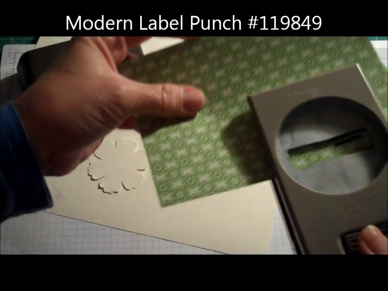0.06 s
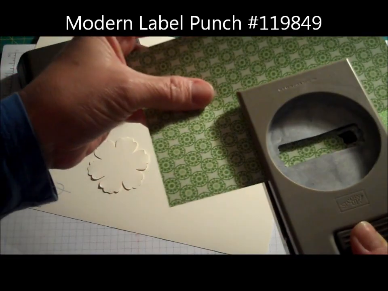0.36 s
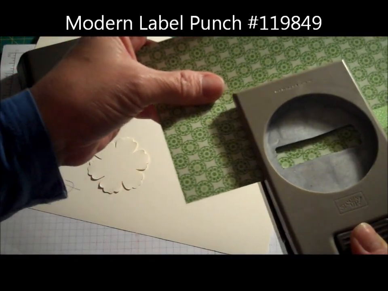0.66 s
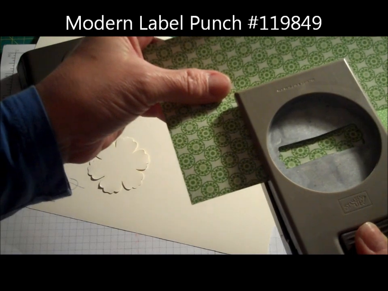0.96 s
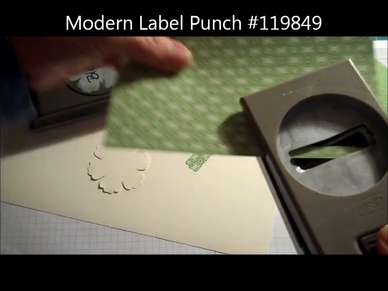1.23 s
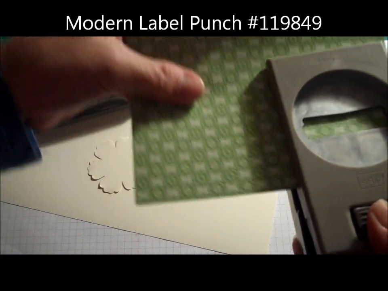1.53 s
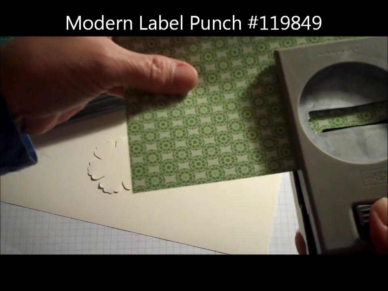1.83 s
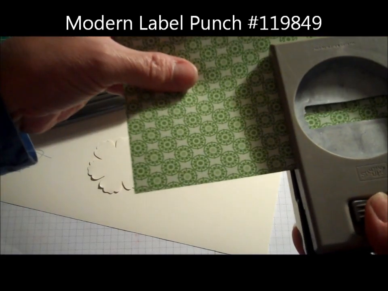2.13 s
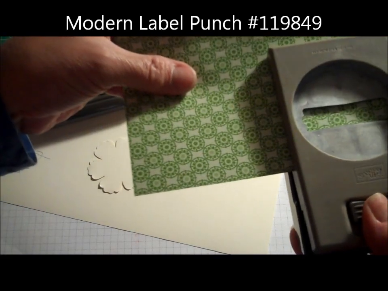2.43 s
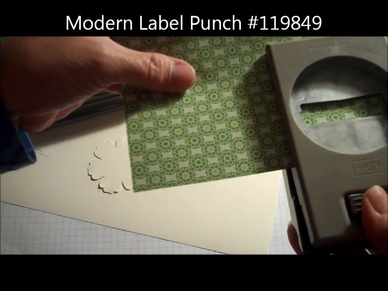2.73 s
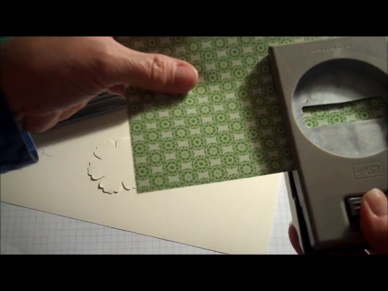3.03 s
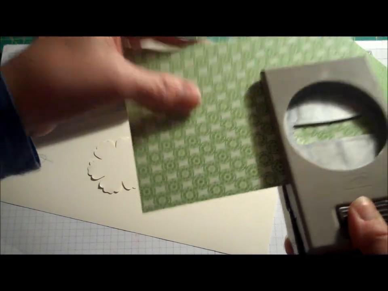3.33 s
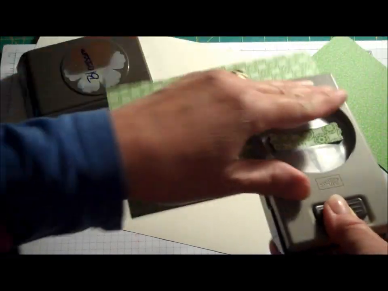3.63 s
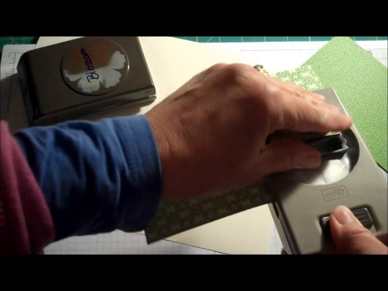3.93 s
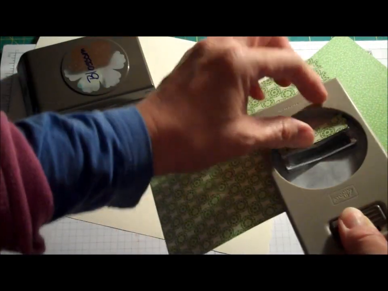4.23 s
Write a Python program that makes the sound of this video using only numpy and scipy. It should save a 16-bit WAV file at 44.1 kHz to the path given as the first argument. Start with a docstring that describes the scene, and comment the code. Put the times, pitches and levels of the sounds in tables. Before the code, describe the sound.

Close up in a small room, stiff paper scrapes and rustles in short pushes as it is fed into a handheld punch. The handling almost stops, then come two sharp knocks and some loose rattling. The punch goes through with a loud, crunching clack that overloads the microphone, and snaps back with a slight metallic ring. A few soft paper ticks finish, over faint hiss and a thin high whine.

```python
"""A sheet of patterned card rustles and ticks as friction drives it along the slot of a hand craft punch.
The punch knocks down twice, is pressed through the card with a loud crunching clack, springs back and snaps.
Each blow excites the modes of its plastic shell and its steel; the loose die rattles.
The loudest clacks carry a brief low thump and overload the microphone.
A small room, faint hiss and a thin camera whine lie behind."""
import sys
import numpy as np
from scipy import signal
from scipy.fft import rfft, irfft, next_fast_len
from scipy.io import wavfile
from scipy.ndimage import uniform_filter1d, map_coordinates

SR = 44100
rng = np.random.default_rng(int(sys.argv[2]) if len(sys.argv) > 2 else 0)


def to_wav(sig):
    """Store sig (one row per channel, or 1-D mono) as 16-bit WAV at the path in sys.argv[1].

    Samples outside -1..1 are clipped; the rate is SR.
    """
    pcm = np.clip(np.atleast_2d(sig), -1, 1) * 32767
    pcm = np.round(pcm).astype(np.int16)
    wavfile.write(sys.argv[1], SR, pcm.T)  # frames by channels


N = 192805

# blows of the punch: t/s, level/dB, rise/s, hold/s, knock/dB, treble/dB,
# main contact resonance f/Hz, its gain/dB, second resonance f/Hz, grip of the hand (0-1)
BLOWS = [ (3.0345, 15.2, 0.004, 0.0023, 0, -1.5, 1730, 10, 394, 0),
         (3.1661, 17, 0.00061, 0.0057, 1, 2, 1106, 6.5, 458, 0),
         (3.5425, 25.5, 0.00284, 0.00502, -7.5, -0.5, 1295, 8.5, 2450, .5),
         (3.7068, 20, .00079, .0027, -12.5, 1.5, 2295, 11, 3860, 0.9),
         (3.7548, 7, 0.0002, 0.001, -3, 1.5, 920, 18.5, 1640, 1)]
def clacks(t60=0.014, second_db=6):
    """Impact excitation: each blow sounds the hollow shell and two resonances of the struck spot."""
    track = np.zeros((2, N))
    for start, db, rise, hold, knock_db, treble_db, main_hz, main_db, second_hz, _ in BLOWS:
        spots = [(main_hz, main_db), (second_hz, second_db)]
        add(track, start, amp(db) * contact(rise, hold, t60, knock_db, treble_db, spots, hollow=0.75))
    return spread(track)


# spectral envelope of the plastic shell: f/Hz, level/dB
SHELL_SPECTRUM = [(60, -31), (170, -13), (300, -13.5), (400, -8), (680, -11), (1000, -3), (2500, -3.5),
                  (3600, 0), (6000, 1.5), (8000, 3), (10500, -11.5), (14000, -17.5)]
# its resonances: f/Hz, half-width/Hz, gain/dB at hollow = 1
SHELL_MODES = [(492, 27, 9), (1158, 61, 15), (1269, 23, 9.5), (1438, 26, 6.5), (1770, 76, 10),
               (2116, 17, 9.5), (2550, 114, 9.5), (2907, 41, 13.5), (3150, 75, 7), (3930, 110, -3),
               (4010, 18, 7.5), (4430, 30, 7), (5383, 47, 8.5), (5900, 180, 7), (6670, 75, 4.5)]
def contact(rise, hold, t60, knock_db, treble_db, spots, hollow, size=8192):
    """Source and filter: surface chatter drives the shell and the struck spot's (f/Hz, gain/dB) peaks."""
    t, hz = np.arange(size) / SR, np.fft.rfftfreq(size, 1 / SR)
    force = np.minimum(t / rise, 1) * amp(-60 * np.maximum(t - rise - hold, 0) / t60)
    chatter = rng.standard_normal((2, size))
    for _ in range(2):  # hard contact excites all frequencies evenly
        phase = np.angle(rfft(chatter * np.sqrt(force)))
        chatter = irfft(np.exp(1j * phase))
    chatter *= np.sqrt(force)
    chatter /= np.linalg.norm(chatter, axis=1, keepdims=True)
    peak = lambda centre, width: 1 / (1 + ((hz - centre) / width) ** 2)
    db = along(SHELL_SPECTRUM, hz)
    db += hollow * sum(gain * peak(f, width) for f, width, gain in SHELL_MODES)
    db += sum(gain * peak(f, 0.13 * f) for f, gain in spots)
    db += along([(550, knock_db), (1050, 0), (2600, 0.0038), (5500, treble_db)], hz)
    # each point of contact favours some of the shell's many upper modes and misses others
    db += 2.5 * ripple(hz.shape, size=(20,)) * along([(1000, .4), (2500, 1)], hz)
    return irfft(rfft(chatter) * minimum_phase(db))


# modes of the die and spring: f/Hz, relative level/dB, undamped by the hand t60/s
STEEL_MODES = [(1096, -5.5, 0.82), (1143, -2.5, 0.9), (1240, -13, .5), (2046, -6, 0.26), (2995, -4, 0.25),
               (3660, -6, 0.44), (4430, -16, .2), (6000, -22.5, .18)]
def steel_ring(ring_db=-50, grip_db=-27, grip_damping=0.63, buzz=0.36):
    """Damped free vibration: the steel rings after each blow, softer and shorter under a firm grip."""
    track, t = np.zeros(N), np.arange(SR) / SR
    for start, db, rise, *_, grip in BLOWS:
        life = 1 - grip_damping * grip
        ring = np.zeros(SR)
        for hz, level, t60 in STEEL_MODES:
            decay = amp(level + rng.normal(0, 1.2) - 60 * t / (t60 * life))
            ring += decay * np.sin(2 * np.pi * hz * t)
        add(track, start + rise, amp(db + ring_db + grip_db * grip) * ring)
    return track * (1 + buzz * wobble(150))  # the spring rattles in its seat


# knocks of the loose die: t/s, level/dB, hold/s, t60/s, treble/dB, contact resonance f/Hz
DIE_KNOCKS = [ (2.203, -25, .0003, .035, -8, 1600), (2.36, -22.5, .0003, .012, -2, 1900),
              (2.775, -18, .0003, .03, -16, 1400), (3.1473, 1, .013, .022, -6, 5800),
              (3.328, 0.5, .005, 0.042, -5, 1800), (3.366, -5.5, .001, .035, -1, 1260),
              (3.401, -5.5, .001, 0.066, -1, 1251), (3.587, 2, 0.0037, 0.015, 1, 2300),
              (3.6045, 2, 0.0046, .018, -1, 1140), (3.68, -10.5, .0005, 0.07, -3.5, 7450),
              (3.7, -6.5, 0.0049, 0.011, 1, 7540), (3.714, 7, .003, .14, -6, 2130)]
def die_rattle(rise=0.0013, knock_db=-5.5, spot_db=9):
    """Impacts across a clearance: the loose die strikes the shell before and between the blows."""
    track = np.zeros((2, N))
    for start, db, hold, t60, treble_db, hz in DIE_KNOCKS:
        knock = contact(rise, hold, t60, knock_db, treble_db, [(hz, spot_db)], hollow=0.75)
        add(track, start, amp(db) * knock)
    return spread(track)


# low thumps under the loudest clacks: t/s, level/dB
LOW_THUMPS = [(3.1655, -55), (3.5458, -14), (3.706, -50)]
def low_thump(pulse_s=0.0011, tail_s=0.049):
    """A pulse of zero net area: a brief low thump, then a slow, faint sub-bass tail of opposite sign."""
    track, t = np.zeros(N), np.arange(SR // 2) / SR
    pulse = t / pulse_s * np.exp(1 - t / pulse_s)
    tail = np.e * pulse_s * t / tail_s ** 2 * np.exp(-t / tail_s)
    for start, db in LOW_THUMPS:
        add(track, start, amp(db) * (pulse - tail))
    return track


# spectral densities of the rubbed sheet and of its edge: f/Hz, relative level/dB
SHEET_SPECTRUM = [(150, -54), (260, -18.5), (400, -16), (610, -20.5), (800, -9.5), (930, -5), (1030, -10.5),
                  (1350, -4), (1670, 0.5), (1880, -1.2), (2020, -7), (2900, -6), (4000, -7.5), (5500, -26)]
EDGE_SPECTRUM = [(2000, -33), (3200, -10), (4500, -5.5), (5500, -3), (5850, 0.5), (6600, -2), (7500, 2.5),
                 (8300, -8), (9200, -12.5), (10200, -22), (14000, -29.5)]
# pushes of the card: t/s, rise/s, slide/s, fall by 20 dB/s, sheet level/dB, edge over sheet/dB
PUSHES = [ (-0.02, .02, 0.062, 0.14, -37, 8), (0.11, 0.051, .135, 0.12, -46.5, 3.5),
          (0.34, .06, 0.048, 0.05, -47, 2.5), (0.43, 0.058, .005, 0.34, -42, 4),
          (0.982, .05, .015, 0.2, -40, 6), (1.03, 0.052, 0.17, 0.05, -37.5, 6.5),
          (1.286, 0.026, 0.089, 0.09, -39.5, 8), (1.37, 0.049, .05, 0.0642, -33.5, 3.5),
          (1.455, 0.041, .002, 0.09, -28.5, 3.2), (1.615, 0.038, .025, .14, -37.5, 4),
          (1.83, 0.043, .02, 0.1051, -52.5, 3), (1.93, 0.078, .003, .04, -53.5, 4.5),
          (2.44, 0.039, 0.0046, 0.06, -54, 0.5), (2.57, .04, 0.0073, .06, -50.5, 1.5),
          (3.225, 0.03, 0.15, 0.16, -42, 6), (3.77, 0.034, 0.056, 0.33, -50.5, 6),
          (3.94, 0.022, 0.15, 1, -59, 10), (4.12, 0.042, .003, 0.02, -42, 3.5),
          (4.24, .07, .07, .1, -58.5, 15)]
def card_slide(slowing_db_per_s=9):
    """Sliding friction: with each slowing push the sheet radiates a hollow rush and its edge hisses."""
    sheet_power, edge_power = np.zeros((2, N))
    for start, rise, slide, fall, db, edge_db in PUSHES:
        push = amp(db) * swell(start, rise, slide, fall, slowing_db_per_s)
        sheet_power += push ** 2
        edge_power += (amp(edge_db) * push) ** 2
    sheet = friction(SHEET_SPECTRUM, catches_per_s=600, catch_db=-11.5, flutter_db=0.27, flex_db=2.5)
    edge = friction(EDGE_SPECTRUM, catches_per_s=300, catch_db=-7, flutter_db=0.96, flex_db=2.0)
    pressure = amp(.7 * wobble(35))
    return (np.sqrt(sheet_power) * sheet + np.sqrt(edge_power) * edge) * pressure


def friction(spectrum, catches_per_s, catch_db, flutter_db, flex_db):
    """Roughness noise: rubbing fibres give a fine rush with sparse catches, under uneven pressure."""
    catches = (rng.random(N) < catches_per_s / SR) * rng.standard_normal((2, N))
    rub = rng.standard_normal((2, N)) + amp(catch_db) * unit(catches)
    rub *= amp(flutter_db * wobble(70))
    return spread(coloured(flexed(rub, flex_db), spectrum))


def flexed(x, depth_db):
    """Time-varying filtering: the sheet's narrow resonances come and go as it bends."""
    frames = signal.stft(x, nperseg=1024)[2]
    frames *= amp(depth_db * ripple(frames.shape[1:], size=(3, 10)))
    return signal.istft(frames, nperseg=1024)[1][:, :N]


# the card's edge catching in the slot: t/s, level/dB, t60/s, treble/dB, resonance f/Hz
EDGE_TICKS = [ (1.011, -9.5, 0.11, 2.5, 1710), (1.093, -11, .01, 1, 7000), (1.13, -5.5, .04, -2, 6000),
              (1.162, -5.5, .008, -2.5, 6960), (1.206, -11.5, 0.018, 0, 6250),
              (1.308, -7.5, 0.043, -1, 6450), (1.494, 2.5, 0.045, -9.5, 1730),
              (1.641, -13.5, .08, -1, 1700), (2.008, -21, .03, 2.5, 1500), (3.3408, -2.5, .018, 1, 6500),
              (3.4141, -7.5, 0.01, 0.5, 6700), (3.443, -14, 0.019, -4, 7350),
              (3.8148, -8, 0.065, 6.5, 5300), (3.8578, -12, .01, 1.5, 6900), (3.871, -11, 0.01, 0.5, 7460),
              (4.009, -26.5, 0.0038, 16.5, 11400), (4.03, -3, 0.031, 1.5, 5240), (4.09, -26, .014, 9, 7850),
              (4.232, -13, 0.11, 5, 4600), (4.239, -3.5, 0.011, 6.5, 5650)]
# the sheet bumping on the desk: t/s, level/dB, resonance f/Hz
SHEET_BUMPS = [(0.753, -18, 420), (1.272, -10.5, 402), (1.309, -9.5, 723)]
def card_taps(rise=0.00058, hold=0.00013, hollow=0.43):
    """Light impacts: the card's crisp ticks and soft bumps are too weak to ring the steel."""
    track = np.zeros((2, N))
    for start, db, t60, treble_db, hz in EDGE_TICKS:
        tick = contact(rise, hold, t60, knock_db=-6, treble_db=treble_db, spots=[(hz, 12)], hollow=hollow)
        add(track, start, amp(db) * tick)
    for start, db, hz in SHEET_BUMPS:
        bump = contact(rise, hold, t60=0.056, knock_db=10, treble_db=-10, spots=[(hz, 14.5)], hollow=hollow)
        add(track, start, amp(db) * bump)
    return spread(track)


# reverberation time of the room: f/Hz, t60/s
ROOM_DECAY = [(200, 0.18), (1200, .2), (5000, 0.17), (12000, 0.13)]
def reverberation(x, delay_s=.004):
    """Diffuse reflection: the desk and near walls answer with a short, exponentially decaying tail."""
    hz, t, frames = signal.stft(rng.standard_normal((2, SR // 3)), SR, nperseg=256)
    decay = amp(-60 * t / along(ROOM_DECAY, hz)[:, None])
    tail = signal.istft(frames * decay, SR, nperseg=256)[1]
    tail /= np.linalg.norm(tail[0])
    tail = np.pad(tail, ((0, 0), (round(delay_s * SR), 0)))
    return spread(signal.fftconvolve(x[:1], tail, axes=1)[:, :N])


# spectral density of the background noise: f/Hz, relative level/dB
HISS_SPECTRUM = [(15, -22), (25, -13.5), (70, -11.5), (197, -6), (301, -6.5), (598, -10), (1250, -12.5),
                 (2770, -16), (3000, -15), (3340, -14.5), (4470, -11.5), (4830, -14.5), (6130, -9),
                 (13900, -24)]
def room_hiss(level_db=-53):
    """Stationary noise: room rumble and a hiss with a faintly ribbed spectrum."""
    ribs = lambda hz: amp(ripple(hz.shape, size=(200,)) * along([(500, .5), (2500, 1.9)], hz))
    noise = filtered(rng.standard_normal((2, N)), ribs)
    return amp(level_db) * spread(coloured(noise, HISS_SPECTRUM))


# faint camera tones: f/Hz, level/dB
CAMERA_TONES = [(195, -69), (249, -73), (3009, -70), (3628, -75), (4344, -76), (4592, -70), (5050, -77),
                (6638, -77)]
# spells of the whine: t/s, duration/s, level/dB
WHINE_SPELLS = [(0, 1.9, -58), (2.087, 0.2, -63), (2.457, 0.59, -58), (2.8, .22, -58)]
def camera_whine(whine_hz=6126, idle_db=-69, fade_s=.025):
    """A line spectrum: faint lasting tones and one thin whine that swells and recedes."""
    hum = sum(amp(db) * tone(hz) for hz, db in CAMERA_TONES)
    spells = [amp(db) * swell(start, fade_s, length, fade_s) for start, length, db in WHINE_SPELLS]
    whine_gain = np.hypot(np.linalg.norm(spells, axis=0), amp(idle_db))
    return hum + whine_gain * tone(whine_hz)


def tone(hz, drift_hz=3):
    """Slight random modulation of frequency and amplitude: a nearly steady line of rms about 1."""
    phase = 2 * np.pi * np.cumsum(hz + drift_hz * wobble(40)) / SR
    return np.sqrt(2) * amp(wobble(34)) * np.sin(phase)


# likeness of left and right: f/Hz, coherence (0-1)
COHERENCE = [(100, 0.74), (1200, 0.9), (2200, 0.8), (4000, 0.57), (6000, 1), (8000, 0.22), (11000, 0.19)]
def spread(pair):
    """Partial coherence: two unrelated signals mix as mid and side, least alike in the high treble."""
    angle = lambda hz: np.arccos(np.clip(along(COHERENCE, hz), 0, 1)) / 2
    mid, side = filtered(pair, lambda hz: np.array([np.cos(angle(hz)), np.sin(angle(hz))]))
    return np.array([mid + side, mid - side])


def swell(start, rise, hold, fall, sag_db_per_s=0, steepening=1.35):
    """An envelope that rises, sags while held, then dies ever faster, by 20 dB after fall seconds."""
    t = np.arange(N) / SR - start
    attack = np.sin(np.pi / 2 * np.clip(t / rise, 0, 1)) ** 2
    sag_db = sag_db_per_s * np.clip(t - rise, 0, hold)
    release_db = 20 * (np.maximum(t - rise - hold, 0) / fall) ** steepening
    return attack * amp(-sag_db - release_db)


def wobble(rate):
    """Spline interpolation: a smooth random curve, rate knots a second."""
    knots = rng.standard_normal(int(N * rate / SR) + 4)
    return map_coordinates(knots, [np.arange(N) * rate / SR])


def ripple(shape, size):
    """Moving averages: a random field of rms 1, smooth over size cells along each axis."""
    field = rng.standard_normal(shape)
    for axis, cells in enumerate(size):
        field = uniform_filter1d(uniform_filter1d(field, cells, axis), cells, axis)
    return unit(field)


def minimum_phase(db):
    """Causality: the response with these dB that rings only after the blow."""
    cepstrum = irfft(np.log(amp(db)))
    half = len(cepstrum) // 2
    return np.exp(rfft(np.r_[cepstrum[0], 2 * cepstrum[1:half], np.zeros(half)]))


def filtered(x, response):
    """Linear filtering: the spectrum of x times a response of frequency."""
    size = next_fast_len(N + SR // 2)
    return irfft(rfft(x, size) * response(np.fft.rfftfreq(size, 1 / SR)), size)[..., :N]


def coloured(x, spectrum):
    """Spectral shaping by (f/Hz, level/dB) points, at rms 1."""
    return unit(filtered(x, lambda hz: amp(along(spectrum, hz))))


def along(points, hz):
    """Interpolation of (f/Hz, value) points on a log frequency axis."""
    f, values = np.transpose(points)
    return np.interp(np.log(hz + 1), np.log(f + 1), values)


def add(track, start, sound):
    """Superposition: mix a sound into the track at start seconds."""
    part = track[..., round(start * SR):][..., :sound.shape[-1]]
    part += sound[..., :part.shape[-1]]


def amp(db):
    """Decibels to amplitude ratio."""
    return 10 ** (np.asarray(db) / 20)


def unit(x):
    """Normalisation to rms 1."""
    return x / np.sqrt(np.mean(x ** 2) + 1e-20)


def scene(room_db=-15.5):
    """Superposition of punch, card and background; the clacks, ring, rattles and taps excite the room."""
    impacts = clacks() + steel_ring() + die_rattle() + card_taps()
    direct = impacts + card_slide() + low_thump()
    return direct + amp(room_db) * reverberation(impacts) + room_hiss() + camera_whine()


# imbalance of the microphone's two ports: f/Hz, left minus right level/dB
PORT_BALANCE = [(300, 1.5), (1000, 0), (2200, 0.5), (4500, 0), (5900, -5.5), (6600, 1.5), (7300, 14.5),
                (8500, 10.5), (13000, 6.5)]
def record(dry, lag_s=.000028, ceiling=0.99, hardness=9, lopsided=0.023, top_hz=14250):
    """Asymmetric saturation: two unlike ports feed an input that overloads, then a band limit."""
    side = np.array([[.5], [-.5]])

    def ports(hz):
        """Level and time difference: the left lags a little; the mean power stays flat."""
        gain = amp(side * along(PORT_BALANCE, hz))
        gain /= np.sqrt(np.mean(gain ** 2, axis=0))
        return gain * np.exp(-2j * np.pi * hz * lag_s * side)

    x = filtered(dry, ports)
    limit = ceiling * (1 + lopsided * np.sign(x))
    saturated = x / (1 + np.abs(x / limit) ** hardness) ** (1 / hardness)
    return filtered(saturated, lambda hz: hz < top_hz)


dry = scene()
out = record(dry)
to_wav(out)
```